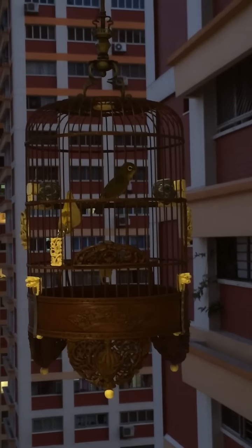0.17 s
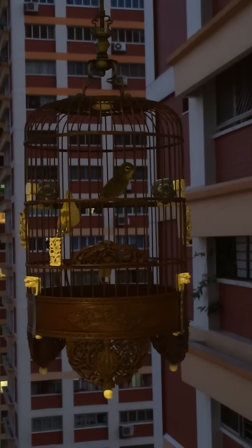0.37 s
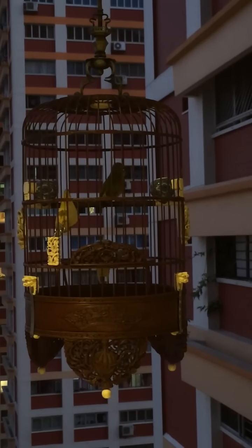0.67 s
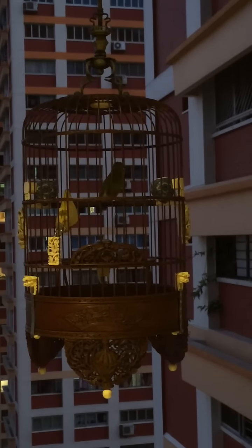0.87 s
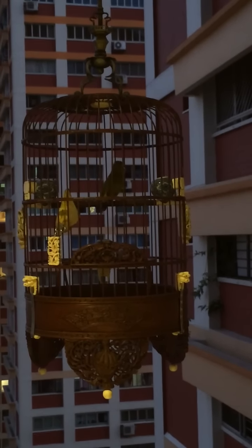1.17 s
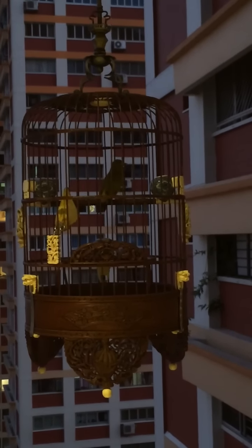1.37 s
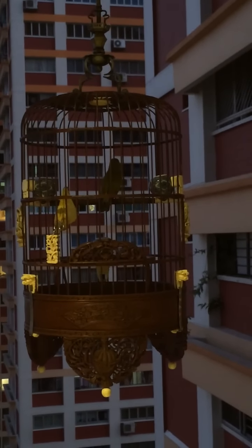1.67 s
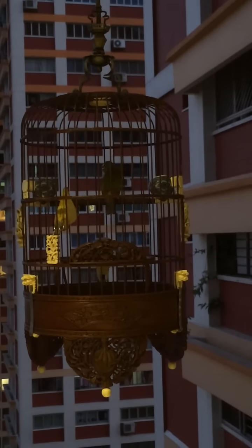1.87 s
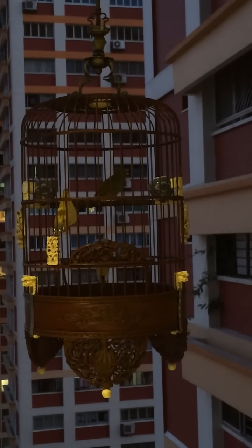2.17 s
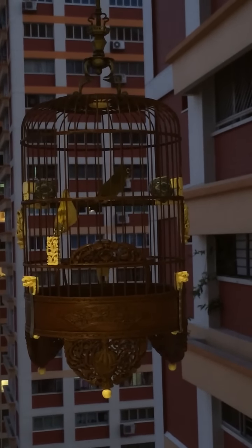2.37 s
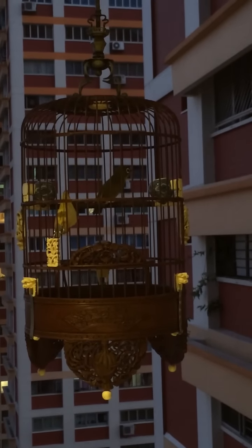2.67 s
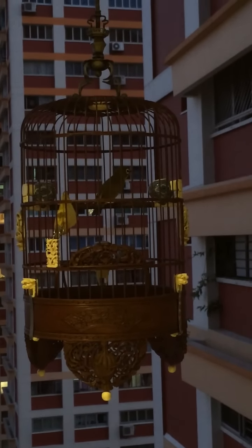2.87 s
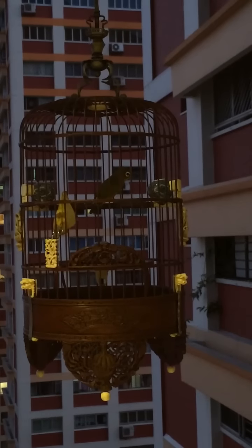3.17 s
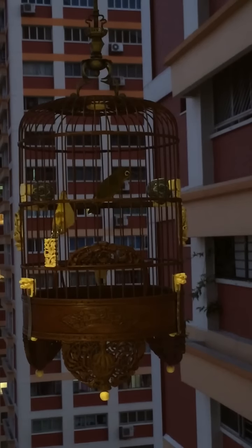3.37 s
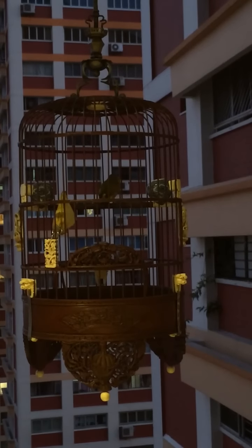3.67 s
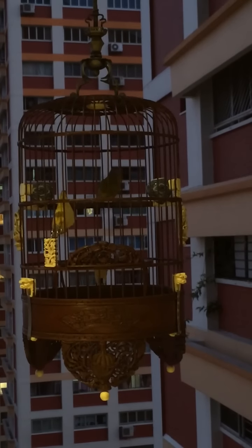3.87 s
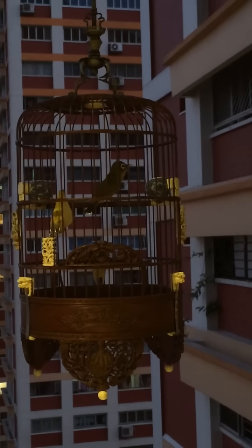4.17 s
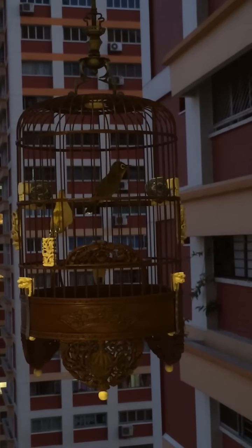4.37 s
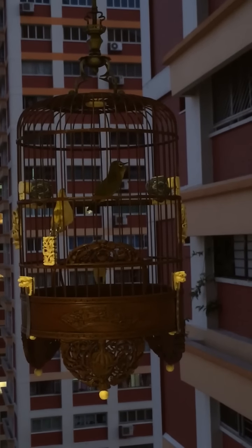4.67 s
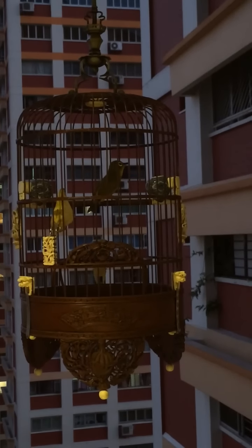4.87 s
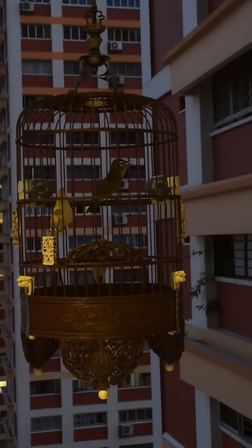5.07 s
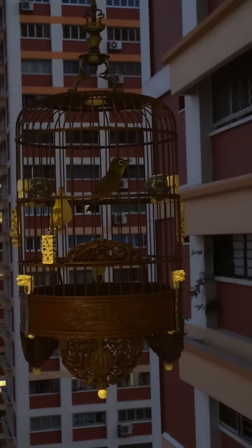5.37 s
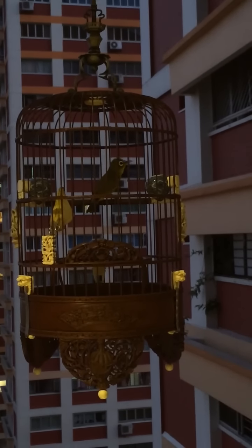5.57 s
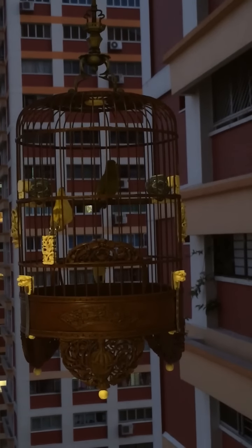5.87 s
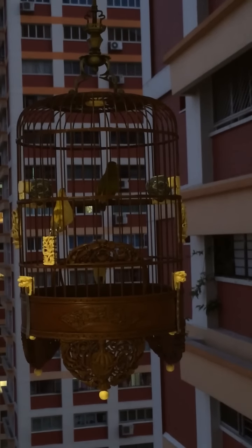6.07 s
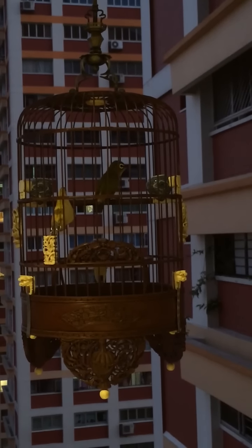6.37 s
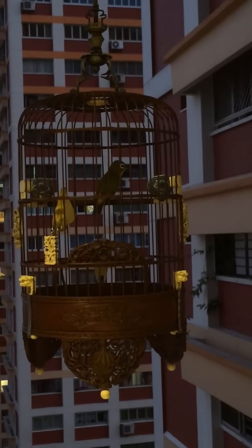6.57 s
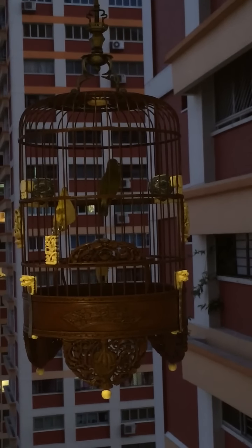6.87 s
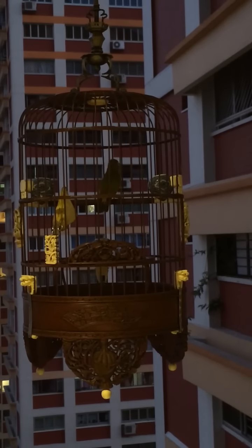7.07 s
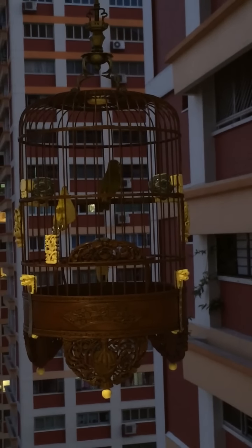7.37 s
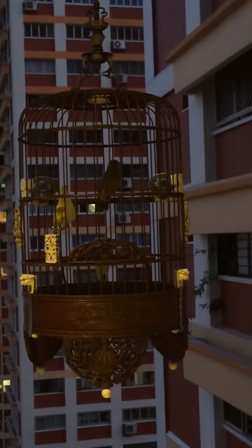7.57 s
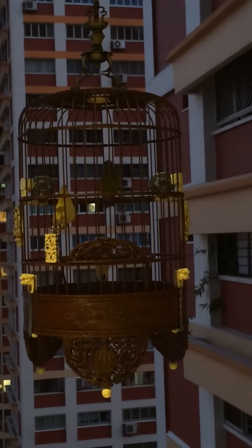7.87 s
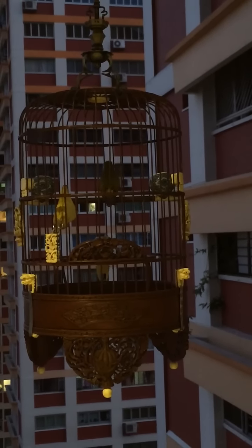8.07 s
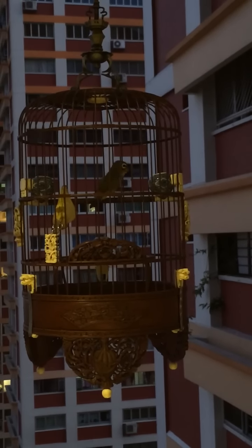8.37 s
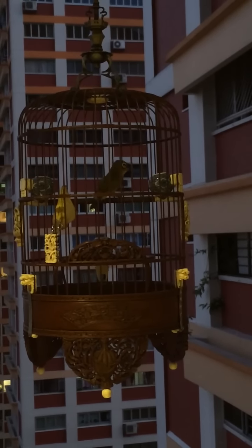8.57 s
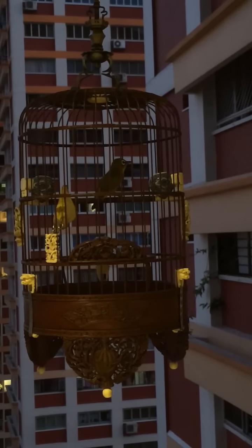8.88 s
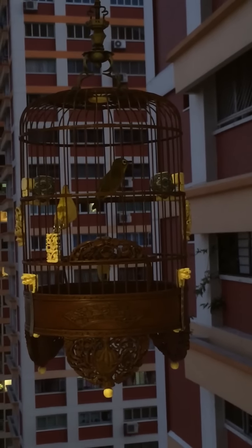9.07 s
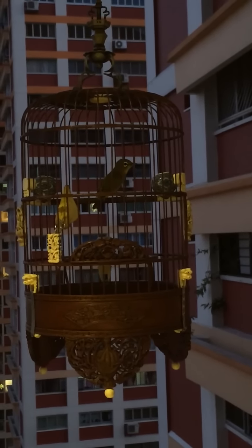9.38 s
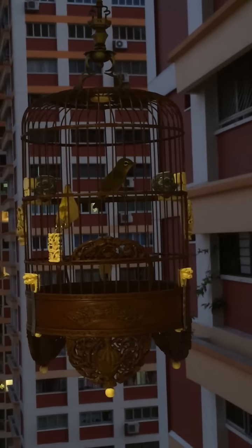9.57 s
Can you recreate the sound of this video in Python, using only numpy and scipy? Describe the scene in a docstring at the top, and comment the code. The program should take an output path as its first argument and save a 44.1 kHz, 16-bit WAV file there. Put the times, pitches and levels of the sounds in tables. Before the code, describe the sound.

A small caged songbird whistles close to the microphone outdoors: rapid, high, downward-sliding chirps, slightly quivering and raspy at the onset. Short phrases are split by pauses in which a low harsh churr, fainter birds farther off and a few dry clicks appear. Hard building walls return bright echoes and a diffuse tail. Low distant traffic, thin hiss and weak mains hum stay beneath, dipping slightly after loud notes.

```python
"""Quick falling whistles ring out close by, with harsh churrs, fainter bird calls and dry clicks between them.
A caged white-eye whistles on a ledge between apartment blocks: gliding tones with overtones and a little rasp.
Random echo patterns and fading noise tails stand for the walls that throw each note back.
Shaped noise makes the distant traffic and hiss below, and steady tones make the mains hum.
Loud notes turn the camera's gain down, so everything else ducks with them."""
import sys
import numpy as np
from scipy import signal
from scipy.fft import rfft, irfft, next_fast_len
from scipy.io import wavfile
from scipy.ndimage import uniform_filter1d, minimum_filter1d, map_coordinates

SR = 44100
rng = np.random.default_rng(int(sys.argv[2]) if len(sys.argv) > 2 else 0)


def store_wav(level_fs):
    """Save 16-bit WAV to argv[1]."""
    pcm = np.round(np.clip(np.atleast_2d(level_fs), -1, 1) * 32767)
    wavfile.write(sys.argv[1], SR, pcm.T.astype(np.int16))


N = 429526

# The white-eye's syllables, as aims for the pitch and level curves. Each row: start in seconds,
# length in seconds, top pitch in Hz, hold in seconds, slide in seconds, shelf pitch in Hz, rebound in Hz,
# end pitch in Hz, level in dB, fade over the length in dB, quiver as a share of the pitch, overtone lift in dB.
SYLLABLES = [(0.677, 0.2, 4893, 0.055, 0.072, 3206, 281, 3750, -12, 15.5, 0.018, 1.5),
             (0.879, 0.042, 4240, 0.004, 0.02, 3870, 0.0, 4090, -20, 5.5, 0.046, 0.5),
             (1.091, 0.2, 5136, 0.016, 0.047, 4005, 189, 3240, -17.0, 9.0, 0.038, -2),
             (1.46, 0.14, 4620, 0.008, 0.041, 3524, -0.5, 3320, -18, 8.5, 0.041, 2.5),
             (1.658, 0.2, 4712, 0.011, 0.066, 4220.0, 65, 3224, -15, 14.5, 0.039, 2.5),
             (2.349, 0.189, 4780, 0.02, 0.019, 4390, -7.5, 3246, -14.5, 12, 0.048, 2.5),
             (2.587, 0.16, 4600, 0.024, 0.027, 3714, 65, 3270, -20, 5, 0.045, 1),
             (3.997, 0.13, 5030, 0.019, 0.026, 4030.0, 1, 3280, -16.5, 9.5, 0.063, 3.5),
             (4.198, 0.038, 5010.0, 0.0048, 0.0085, 4320, -2, 3370, -10.5, 11.5, 0.017, 4),
             (4.25, 0.028, 3910, 0.011, 0.0057, 3640, -7, 3180, -15.5, 12.5, 0.01, -9.5),
             (4.287, 0.11, 4535, 0.013, 0.029, 3715, -1.5, 3220, -15, 16.5, 0.028, 2.5),
             (4.562, 0.068, 5384, 0.025, 0.007, 4510, -5.5, 4810.0, -16.5, -2, 0.064, 4.0),
             (4.632, 0.19, 4830.0, 0.0083, 0.017, 3554, 889.5, 3474, -20, 5, 0.02, 3.5),
             (5.056, 0.074, 4710, 0.02, 0.011, 4450, -0.5, 3310.0, -15.0, 8.5, 0.038, 6),
             (5.153, 0.041, 4110.0, 0.0, 0.007, 3704, 0.0, 3260, -22, 1, 0.009, 1.5),
             (5.263, 0.18, 6140, 0.0031, 0.037, 3797, 1.5, 3180, -14.5, 13.5, 0.059, 1),
             (5.718, 0.117, 4130, 0.013, 0.036, 3686, 2, 3520, -31.5, -0.5, 0.005, 10),
             (5.875, 0.14, 5116, 0.005, 0.045, 3745, -4.5, 3190, -12.5, 16.5, 0.026, 2.5),
             (6.803, 0.083, 4190, 0.0062, 0.016, 3900, -4.5, 3350, -32.5, -8.5, 0.0065, 9.5),
             (7.015, 0.191, 5700.0, 0.0049, 0.039, 3895, 3.5, 3190, -14, 12.0, 0.052, 0.0),
             (7.307, 0.152, 4810, 0.053, 0.017, 4170, -5.5, 4364, -15, 9.0, 0.027, 1),
             (7.732, 0.088, 4285, 0.0025, 0.025, 3543, 0.5, 3215, -27.5, -0.5, 0.013, 5),
             (7.829, 0.033, 3610, 0.0018, 0.0036, 3170, -2, 3170, -30.5, 0, 0.012, 8.5),
             (7.918, 0.21, 4934, 0.021, 0.053, 3975, 302, 3156, -15, 13.0, 0.042, 4.5),
             (8.439, 0.078, 4730, 0.019, 0.021, 4360, -7.5, 3670, -14.5, 8.5, 0.048, 5),
             (8.531, 0.05, 3780, 0.004, 0.012, 3640, 0.0, 3250, -23, 4.5, 0.013, 2.5),
             (8.651, 0.19, 5690, 0.004, 0.041, 3798, 1, 3180, -14.5, 14.5, 0.049, 3.5)]
# Softly sung stretches where the octave changes strength. Each row: from and to in seconds, octave lift in dB.
OCTAVE_LIFTS = [(5.7, 5.772, 3), (6.79, 6.85, 5), (7.72, 7.762, -5)]
# How the throat passes the overtones. Each row: frequency in Hz, lift in dB.
THROAT_RESPONSE = [(5600, 5), (6500, -2.5), (7500, -3.5), (8600, -8.5), (10300, -8.5), (12000, 0),
                   (13300, 2.5), (14600, 12.5), (15300, 10)]
# Colour of the rasp. Each row: frequency in Hz, relative strength in dB per Hz.
RASP_COLOUR = [(2500, -2), (5000, 10), (7500, -0.5), (10500, -18), (14500, -14)]
# Low harsh churrs between the phrases. Each row: start in seconds, length in seconds, central pitch in Hz,
# level in dB before the direct and echo gains.
CHURR_NOTES = [(2.993, .078, 2982, -25), (3.084, 0.068, 3326, -20), (3.16, 0.074, 3316, -35.5),
               (6.896, .045, 2830, -38)]
# Calls from farther off, most of them falling. Each row: start in seconds, length in seconds, start pitch in Hz,
# end pitch in Hz, level in dB before the call's common lift and the direct gain.
FAR_CALLS = [(-.06, 0.097, 5290, 4124, -37.5), (.016, 0.048, 4370, 3225, -39),
             (0.299, 0.067, 4540, 3650, -51.5), (.36, .082, 487, 506, -48), (0.555, 0.067, 4955, 3585, -40),
             (1.028, 0.073, 5800, 5370, -49), (1.88, 0.15, 6520, 6000, -61),
             (2.061, 0.12, 6630, 5700, -58.5), (2.24, 0.053, 5450, 3280, -40.5),
             (2.871, 0.0298, 3173, 3836, -33), (2.874, .038, 4920, 4620, -40.5),
             (2.925, 0.041, 4560, 3500, -38.5), (3.028, .027, 3980, 3170, -36),
             (3.529, .11, 5250, 3490, -49.5), (5.603, 0.081, 5390, 3750, -42.5),
             (5.69, 0.039, 485, 496, -45), (5.77, 0.073, 5330, 4130, -37.5),
             (6.313, 0.07, 4900, 4555, -35.5), (6.361, .11, 4903, 4044, -38),
             (6.709, 0.091, 4765, 4050, -35), (8.292, 0.13, 5035, 3545, -40.5),
             (8.978, .055, 7000, 6160, -53.5), (9.143, 0.12, 5060, 3020, -49),
             (9.219, 0.058, 7260, 5450, -53.5), (9.419, .042, 4970, 4330, -40.5),
             (9.47, .052, 4330, 3330, -46.5), (9.599, 0.089, 5750, 3470, -50.5)]
# Dry clicks in the yard. Each row: start in seconds, level in dB before the direct and echo gains.
CLICK_TIMES = [(0.574, -41), (.66, -34), (3.384, -34), (3.399, -29), (6.876, -40), (8.104, -45)]
# Colour of a click. Each row: frequency in Hz, relative strength in dB.
CLICK_SPECTRUM = [(500, -21), (1500, -14), (2500, -2), (4500, -3), (6200, 2), (7500, -8), (12000, -9.5),
                  (15300, -15)]
# How long the yard rings. Each row: frequency in Hz, time to fall by 60 dB in seconds.
YARD_RINGING = [(1000, 0.068), (3500, 0.86), (5000, 0.69), (8000, 0.51), (14000, 0.25)]
# The flow of traffic. Each row: time in seconds, level in dB before the common lift.
TRAFFIC_FLOW = [(0, -49.5), (1.3, -49), (2.2, -49), (3.8, -48), (4.8, -47.5), (5.75, -48), (7.3, -48),
                (8.5, -47.5), (9.74, -49.5)]
# Colour of the traffic. Each row: frequency in Hz, relative strength in dB per Hz.
ROAR_COLOUR = [(15, -54), (25, -30), (48, -3.5), (92, 2), (268, -8), (301, -9.5), (372, -9), (395, -11),
               (489, -10), (571, -9.5), (1510, -15.5), (2600, -21.5), (3380, -53.5), (5720, -120)]
# Colour of the airy hiss. Each row: frequency in Hz, relative strength in dB per Hz.
HISS_COLOUR = [(1500, -47), (2600, -9.5), (4200, -11), (6000, -11), (8000, -17.5), (11000, -22.5),
               (15400, -27)]
# Tones of the mains and machines. Each row: frequency in Hz, rms level in dB.
HUM_TONES = [(100, -61.5), (250, -73), (300, -60), (400, -64.5), (450, -70), (560, -72.5), (735, -70)]

# Shared by all syllables: the climb, the slide, the sag, the rebound and the final drop of the pitch
CLIMB_SHARE, CLIMB_S = 0.075, 0.00987
SLIDE_STEEPNESS, SAG_POWER = 1.72, 3.1
REBOUND_AT, REBOUND_WIDTH = 0.575, 0.19  # shares of the length
DROP_SHARE, DROP_S, SLACK_HZ = 0.68, 0.00478, 2833
# The level swells at the start and is cut off at the end
ATTACK_DB, ATTACK_S, RELEASE_DB, RELEASE_S = 14.5, 0.004, 10.5, 0.0068
TOP_HZ = 15400  # the camera's band limit


def white_eye(direct_db=0, walls_db=-15, yard_db=-12, scatter_db=3):
    """The caged bird with its echoes; the beak beams the overtones at the walls, so they come back stronger."""
    out = np.zeros(N)
    for row in SYLLABLES:
        start, whistle, overtones = syllable(row)
        thrown = whistle + amp(scatter_db) * overtones
        add(out, start, amp(direct_db) * (whistle + overtones))
        add(out, start, amp(walls_db) * near_walls(thrown, first_s=0.0066, last_s=0.049))
        add(out, start, amp(yard_db) * yard(thrown, build_s=0.006, late_db=-23))
    return out


def syllable(row, flick_s=0.008, flick_depth=0.357, quiver_hz=122, jitter=0.18, rasp_db=-30, rasp_s=0.011,
             waver_db=3.0, flick_db=15, flick_fade_s=0.0047, restir=0.2, doubling_db=-46):
    """One whistle flicks up, quivers and slides down; gives start time, fundamental and overtones."""
    s, length, *shape, quiver, bright_db = row
    t = np.arange(s - flick_s, s + length + 0.0011, 1 / SR)
    age, n = t - s, len(t)
    pitch, level, strain = gesture(age, length, *shape)
    rise = np.clip(-age / flick_s, 0, 1)  # falls from 1 to 0 during the flick

    # The syrinx overshoots as it tenses, and the quiver dies away; a rebound stirs it again
    depth = quiver * (np.exp(-np.abs(age) / 0.045) + 0.08) + restir * strain
    quiver_rate = quiver_hz * (1 + 0.13 * wobble(50.2, n))
    swing = depth * np.sin(2 * np.pi * np.cumsum(quiver_rate) / SR)
    hz = pitch * (1 - flick_depth * rise ** 2 + swing + jitter * quiver * wobble(502.6, n))
    phase = 2 * np.pi * np.cumsum(hz) / SR

    # The pitch swings in and out of the throat's resonance, so the level pulses with it
    db = level + 1.2 * wobble(170, n) - 80 * swing
    # The whistle grows less steady as it runs out
    db = db + waver_db * np.sqrt(np.clip(age / length, 0, 1)) * wobble(75.7, n)
    whistle = amp(db - 14 * rise) * np.sin(phase)

    # The throat is tuned to the fundamental, so the overtones vary less in level
    drive_db = bright_db - 10.0 + 0.5 * db
    lift_db = sum(db_up * ((t > a) & (t < b)) for a, b, db_up in OCTAVE_LIFTS)
    # The flick starts below the throat's resonance, so its octave stands out
    lift_db = lift_db + flick_db * np.exp(-np.maximum(age, 0) / flick_fade_s)
    overtones = np.zeros(n)
    for k, overtone_db in zip(range(2, 5), (-35 + lift_db, -39, -52)):
        tone_db = overtone_db + along(THROAT_RESPONSE, k * hz) + 3.0 * wobble(123.4, n)
        playable = k * hz < SR / 2
        overtones += amp(tone_db) * np.sin(k * phase) * playable
    # Every other cycle is a little stronger, which puts a faint line halfway to the octave
    overtones += amp(doubling_db + 4 * wobble(25, n)) * np.sin(1.5 * phase)
    # In hard-driven syllables the membranes rasp until they settle
    rasp_gain = amp(rasp_db + 0.63 * (level.max() + 28))
    overtones += rasp_gain * np.exp(-np.abs(age) / rasp_s) * noise(RASP_COLOUR, n)

    fade_in = np.clip((t - t[0]) / 0.0015, 0, 1)
    fade_out = np.clip((t[-1] - t) / 0.003, 0, 1)
    gate = np.sqrt(2) * fade_in * fade_out
    return t[0], gate * whistle, gate * amp(drive_db) * overtones


def gesture(age, length, top_hz, hold_s, slide_s, shelf_hz, rebound_hz, end_hz, db, fade_db):
    """The syrinx tightens, slides to a shelf, sags and lets go; gives pitch, level and rebound strain."""
    age = np.clip(age, 0, length)
    done, left = age / length, length - age
    held = np.exp(-(np.maximum(age - hold_s, 0) / slide_s) ** SLIDE_STEEPNESS)
    rebound = np.exp(-((done - REBOUND_AT) / REBOUND_WIDTH) ** 2)
    slide = (top_hz - shelf_hz) * held
    sag = (end_hz - shelf_hz) * done ** SAG_POWER
    pitch = shelf_hz + slide + rebound_hz * rebound + sag
    # The pitch drops as the syrinx lets go
    pitch = pitch + (SLACK_HZ - pitch) * DROP_SHARE * np.exp(-left / DROP_S)
    tension = 1 - CLIMB_SHARE * np.exp(-age / CLIMB_S)
    attack_db = ATTACK_DB * np.exp(-age / ATTACK_S)
    release_db = RELEASE_DB * np.exp(-left / RELEASE_S)
    level = db - fade_db * done - attack_db - release_db
    return pitch * tension, level, rebound_hz * rebound / pitch


def near_walls(sound, first_s, last_s, count=9):
    """A few sharp echoes off ledge and ceiling, at delays drawn afresh for each sound."""
    echoes = np.zeros(SR // 4)
    delays = np.clip(rng.uniform(0, 1, count) * (last_s - first_s) + first_s, 0, 0.2)
    echoes[(delays * SR).astype(int)] = rng.choice([-1, 1], count) / np.sqrt(count)
    return signal.fftconvolve(sound, echoes)


def yard(sound, build_s, late_db, late_t60=1.6):
    """The diffuse answer of the blocks builds up, its treble dies first, and the far walls linger."""
    hz, t, z = signal.stft(rng.standard_normal(SR), SR, nperseg=256)
    swell = 1 - np.exp(-t / build_s)
    early = amp(-60 * t / along(YARD_RINGING, hz)[:, None])
    late = amp(late_db - 60 * t / late_t60)
    tail = signal.istft(z * swell * (early + late), SR, nperseg=256)[1]
    return signal.fftconvolve(sound, tail / np.linalg.norm(tail))


def churrs(rough=0.028, rough_hz=500, flutter_db=3, octave_db=-32, fourth_db=-39, direct_db=-2, yard_db=-6,
           throat_hz=2830):
    """A low note shakes so fast in pitch and level that it turns harsh; the throat blocks what lies lower."""
    out = np.zeros(N)
    for start, length, hz, db in CHURR_NOTES:
        n = int(length * SR)
        phase = 2 * np.pi * np.cumsum(hz * (1 + rough * wobble(rough_hz, n))) / SR
        arch = np.sqrt(np.abs(np.sin(np.linspace(0, np.pi, n))))
        swell = arch * amp(db + flutter_db * wobble(164, n))
        harmonics = amp(octave_db) * np.sin(2 * phase) + amp(fourth_db) * np.sin(4 * phase)
        call = swell * (np.sin(phase) + harmonics)
        add(out, start, amp(direct_db) * call)
        add(out, start, amp(yard_db) * yard(call, build_s=0.0036, late_db=-35))
    return filtered(out, lambda hz: 1 / (1 + (throat_hz / (hz + 1)) ** 40))


def neighbours(direct_db=-12, quaver=0.0086, slide_quaver=0.014, flutter_db=2, overtone_db=-33):
    """Other birds' gliding calls arrive mostly by way of the walls; the high ones quaver most."""
    out = np.zeros(N)
    for start, length, start_hz, end_hz, db in FAR_CALLS:
        u = np.linspace(0, 1, int(length * SR))  # share of the call that is over
        depth = quaver + slide_quaver * (start_hz > 3200)
        hz = (start_hz + (end_hz - start_hz) * u) * (1 + depth * wobble(393, len(u)))
        phase = 2 * np.pi * np.cumsum(hz) / SR
        arch = np.sqrt(np.abs(np.sin(np.pi * u)))
        swell = arch * amp(db + 6.0 + flutter_db * wobble(101, len(u)))
        call = swell * (np.sin(phase) + amp(overtone_db) * np.sin(3 * phase))
        add(out, start, amp(direct_db) * call)
        add(out, start, yard(call, build_s=0.004, late_db=-25))
    return out


def clicks(t60=0.017, yard_db=3, direct_db=-5):
    """Short dry cracks, made of noise that dies at once, ring round the yard."""
    out, t = np.zeros(N), np.arange(SR // 10) / SR
    for start, db in CLICK_TIMES:
        crack = amp(db - 60 * t / t60) * noise(CLICK_SPECTRUM, len(t))
        add(out, start, amp(direct_db) * crack)
        add(out, start, amp(yard_db) * yard(crack, build_s=0.0043, late_db=-17))
    return out


def town(traffic_db=1, hiss_db=-59):
    """Distant traffic and a thin airy hiss are noise; mains and machines hum in slightly unsteady tones."""
    t = np.arange(N) / SR
    flow_db = np.interp(t, *np.transpose(TRAFFIC_FLOW))
    roar = amp(flow_db + traffic_db + 0.6 * wobble(6, N)) * noise(ROAR_COLOUR, N)
    hiss = amp(hiss_db + 0.3 * wobble(8.2, N)) * noise(HISS_COLOUR, N)
    drift = wobble(2.2, N)
    hum = sum(amp(db) * np.sin(2 * np.pi * hz * t + 0.18 * drift) for hz, db in HUM_TONES)
    return roar + hiss + np.sqrt(2) * hum


def gain_control(x, threshold_db=-26, slope=0.23, hold_s=0.28, ease_s=0.03):
    """Loud notes pull the gain down; it is held there for a moment and then eases back."""
    power = np.abs(uniform_filter1d(x ** 2, size=256))
    level_db = 10 * np.log10(power + 1e-12)
    needed_db = -slope * np.maximum(level_db - threshold_db, 0)
    hold = int(hold_s * SR)
    held_db = minimum_filter1d(needed_db, hold, origin=(hold - 1) // 2)  # looks back in time
    return x * amp(uniform_filter1d(held_db, int(ease_s * SR)))


def amp(db):
    """Turn decibels into a gain."""
    return 10 ** (np.asarray(db) / 20)


def unit(x):
    """Scale x to an rms of 1."""
    return x / np.sqrt(np.mean(x ** 2) + 1e-20)


def along(points, hz):
    """Read a value between (Hz, value) points on a log frequency axis."""
    f, v = np.transpose(points)
    return np.interp(np.log(hz + 1), np.log(f + 1), v)


def wobble(rate, size):
    """A smooth random curve through `rate` random points a second."""
    points = rng.standard_normal(int(size * rate / SR) + 4)
    return map_coordinates(points, [np.arange(size) * rate / SR])


def filtered(x, response):
    """Weigh each frequency of x by the response."""
    m = next_fast_len(len(x) + 8192)
    return irfft(rfft(x, m) * response(np.fft.rfftfreq(m, 1 / SR)), m)[:len(x)]


def noise(spectrum, size):
    """Coloured noise with an rms of 1."""
    return unit(filtered(rng.standard_normal(size), lambda hz: amp(along(spectrum, hz))))


def add(track, s, sound):
    """Mix a sound into the track from s seconds on, leaving out what falls outside."""
    i = round(s * SR)
    part = sound[max(-i, 0):max(N - i, 0)]
    track[max(i, 0):][:len(part)] += part


def scene():
    """All sources add up at one microphone."""
    return (white_eye() + churrs() + neighbours() + clicks() + town())[None]


def record(dry):
    """The camera rides its gain and keeps nothing above its band limit."""
    return filtered(gain_control(dry[0]), lambda hz: hz < TOP_HZ)[None]


dry = scene()
out = record(dry)
store_wav(out)
```